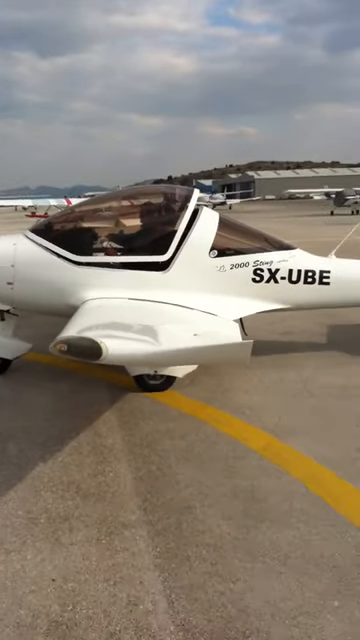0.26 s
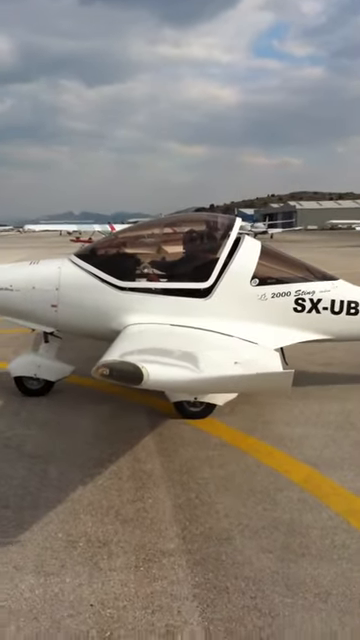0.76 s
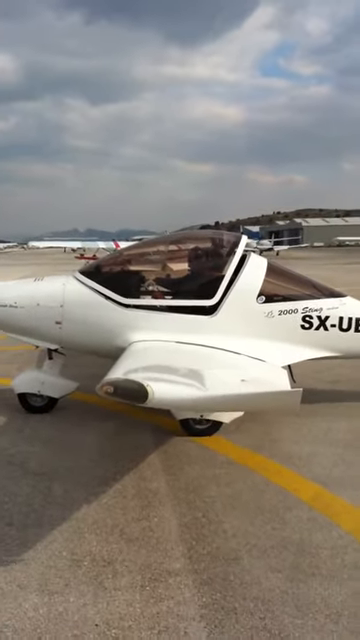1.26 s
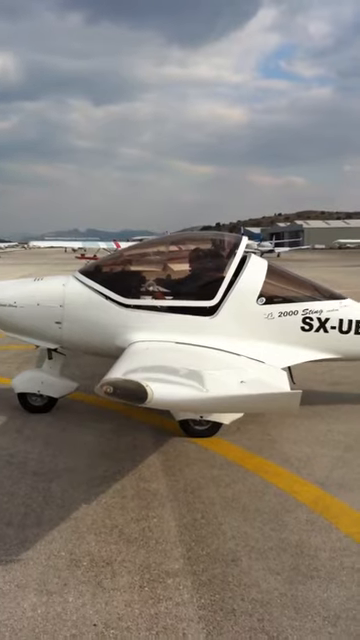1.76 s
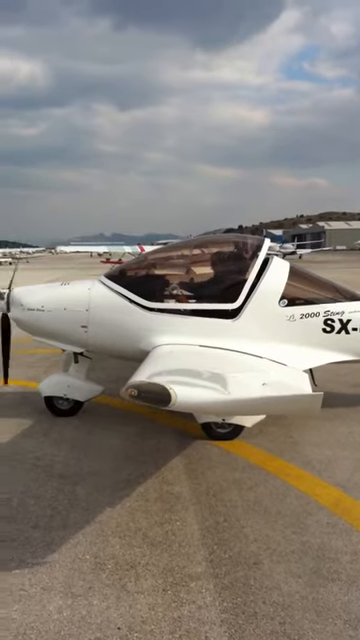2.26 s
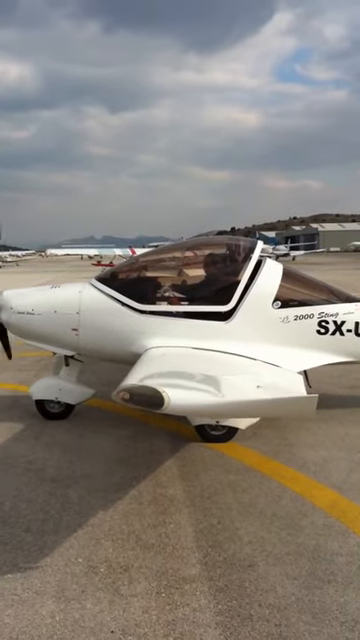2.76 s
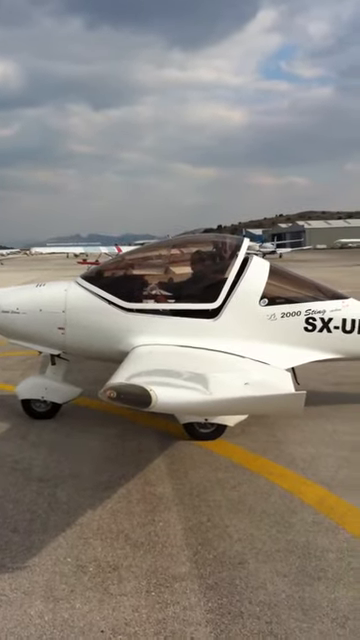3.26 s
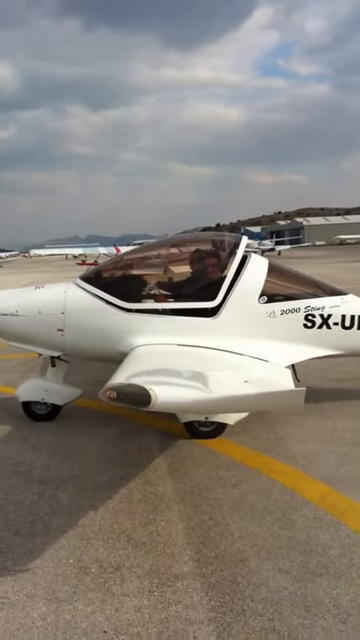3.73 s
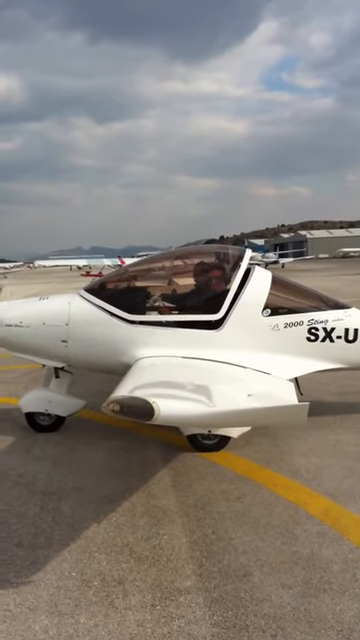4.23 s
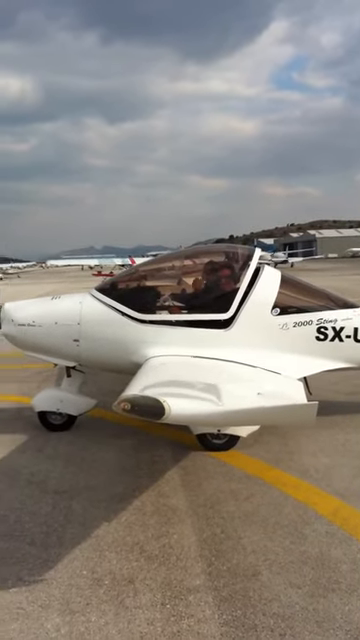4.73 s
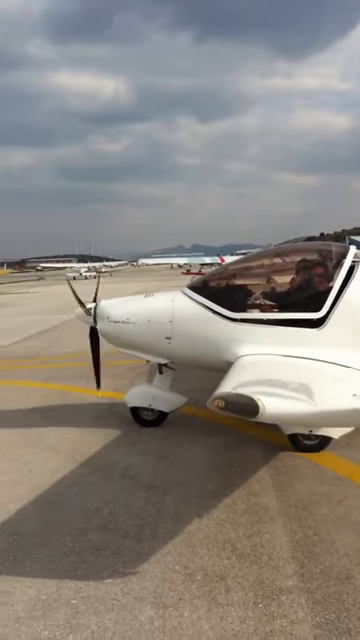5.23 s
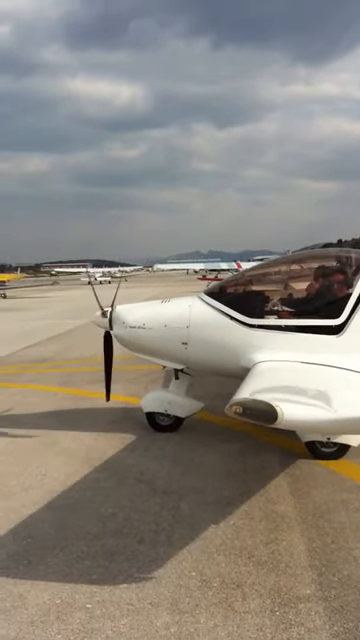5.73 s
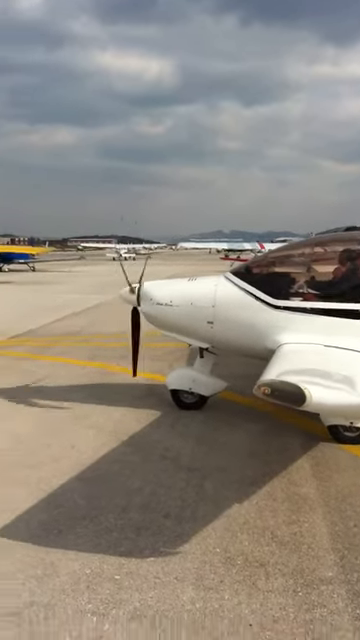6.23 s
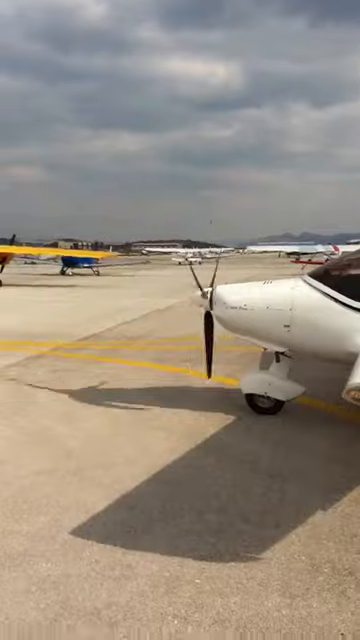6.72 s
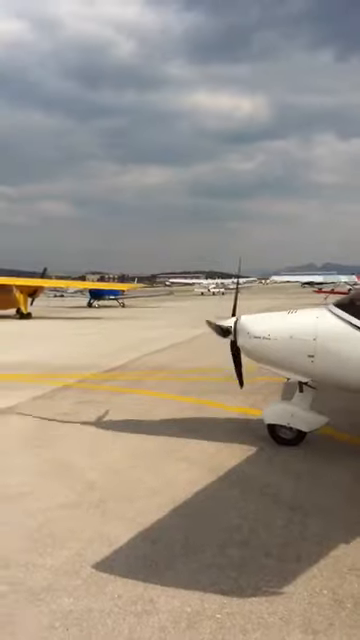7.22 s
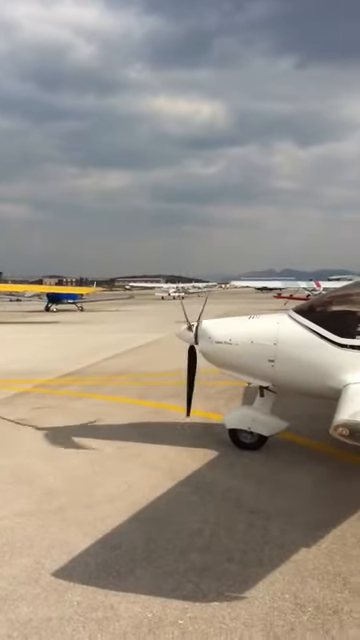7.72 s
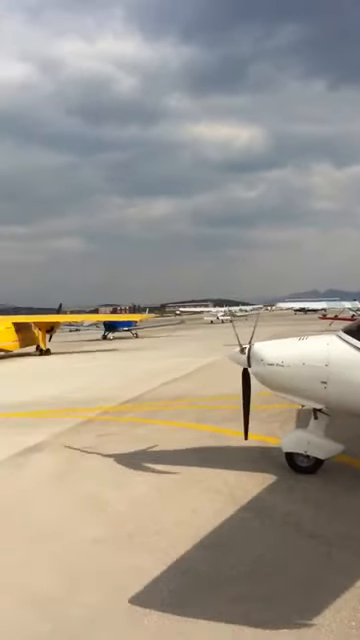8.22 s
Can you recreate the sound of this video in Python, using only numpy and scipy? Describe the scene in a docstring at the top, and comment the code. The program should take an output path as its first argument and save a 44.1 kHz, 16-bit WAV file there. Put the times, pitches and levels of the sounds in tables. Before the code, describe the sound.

Small aircraft engine ticks over and picks up to a faster idle, propeller blades swishing with a high fluttering whistle amid rough wind bursts.

```python
"""Light aircraft at idle

A light aircraft idles on an open apron and is eased up to a faster idle.
Each of its three propeller blades whistles over a broad hiss; its circling makes the pitch swoop and beams the sound.
Underneath, the geared four-cylinder engine burbles with filtered firing puffs and clatters with ringing noise.
Shaped noise makes the breeze and the gusts that buffet the microphone, with sharp pressure swings for cracks."""
import sys
import numpy as np
from scipy import signal
from scipy.fft import rfft, irfft, next_fast_len
from scipy.io import wavfile
from scipy.ndimage import map_coordinates

SR = 44100
rng = np.random.default_rng(int(sys.argv[2]) if len(sys.argv) > 2 else 0)


def pcm_store(signal):
    """Save signal as 16-bit PCM."""
    levels = np.round(np.clip(np.atleast_2d(signal), -1, 1) * 32767)
    wavfile.write(sys.argv[1], SR, levels.astype(np.int16).T)


N = 373968

# Swells of the breeze. Each row: start in seconds, length in seconds, level in dB before the bass cut.
SWELLS = [(0.372, 0.035, -29.5), (0.874, 0.092, -25), (1.094, 0.93, -24), (2.213, 0.18, -22.5),
          (3.206, 0.73, -31), (4.518, 0.338, -28), (5.042, 0.696, -22), (5.985, 0.74, -23),
          (7.577, 0.456, -23.5)]
# Gusts striking the microphone.
# Each row: start in seconds, length in seconds, relative level in dB, nominal brightness in Hz.
GUSTS = [(0.889, .025, -15.5, 280), (1.118, 0.027, -16.5, 433), (1.235, 0.014, -19.5, 157),
         (1.626, 0.047, -13, 880), (1.8, 0.046, -13, 1020), (1.878, .048, -14.5, 1340),
         (1.929, .042, -18, 910), (2.155, 0.03, -19, 340), (2.245, 0.047, -15, 400),
         (2.304, 0.0092, -12, 393), (2.383, 0.036, -14, 483), (2.827, 0.08, -23.5, 155),
         (3.453, 0.019, -25.5, 170), (3.908, 0.036, -20.5, 147), (4.52, 0.02, -26.5, 380),
         (4.991, 0.025, -16.5, 318), (5.175, 0.043, -14.5, 670), (5.217, 0.041, -19.5, 1000),
         (5.283, .02, -21, 650), (5.469, 0.034, -17.5, 550), (5.561, 0.074, -16, 640),
         (5.636, 0.11, -15, 670), (6.07, 0.057, -13.5, 450), (6.202, 0.031, -21, 460),
         (6.293, 0.13, -17.5, 477), (6.459, 0.05, -16.5, 320), (6.53, 0.045, -16.5, 470),
         (6.63, 0.084, -19, 280), (6.713, 0.0897, -15, 420), (7.687, 0.05, -19, 310),
         (7.762, 0.08, -17.5, 376), (7.86, 0.093, -19, 675), (7.952, 0.054, -12.5, 847),
         (8.01, 0.038, -25.5, 690)]
# The hardest eddies, which crack on the microphone.
# Each row: time in seconds, peak in dB before the bass cut, brightness in Hz.
CRACKS = [(.905, -9.5, 860), (1.139, -7.5, 1300), (1.634, -3, 1100), (1.823, -2, 1700), (1.89, -7.5, 1500),
          (1.962, -5, 950), (2.263, -7.5, 700), (5.205, -4, 1200), (5.572, -13, 800), (5.651, -6, 1000),
          (6.54, -9, 750), (6.746, -9, 700)]
# Engine levels over time. Each row: time in seconds, exhaust level in dB, clatter level in dB.
ENGINE_LEVELS = [(0, -40.5, -36.5), (1.5, -30.5, -38), (2.6, -36.5, -36.5), (4.4, -33, -34.5),
                 (5.9, -33.5, -36), (7.2, -33, -36), (8.48, -34.5, -38)]
# Strength of the four cylinders in firing order. Each entry: relative level in dB.
CYLINDERS = [2.5, -7.5, 7.5, -20]
# Clean engine tones. Each row: multiple of crank speed, relative level in dB.
ENGINE_TONES = [(4, -5), (6, 5.5), (9, -2.5), (10, -2), (11, -8.5), (12, -1.5), (13, -6.5), (16, -15)]
# Colour of the exhaust pipe. Each row: frequency in Hz, gain in dB.
PIPE_COLOUR = [(25, -42), (50, -28), (80, -14.5), (120, -3.5), (175, 5), (270, -9.5), (310, -4), (360, 0.5),
               (410, -22), (470, -31), (700, -17), (2000, -65)]
# Valve and gear knocks in one camshaft turn. Each row: place in the turn from 0 to 1, relative level in dB.
KNOCKS = [(0, -1.5), (.2, -13.5), (0.389, -3.5), (0.611, -9), (0.802, -22)]
# Colour of the engine casing. Each row: frequency in Hz, gain in dB.
CASING_COLOUR = [(100, -30), (400, -9), (560, -8), (900, -18), (1300, 3), (1650, -2), (2700, -3.5),
                 (3400, -6.5), (4700, -12.5), (7000, -10.5), (11000, -11.5), (15500, -18.5)]
# Ringing of the crankcase and cowling. Each row: frequency in Hz, width in Hz, gain in dB.
COWL_MODES = [(518, 62, 0.5), (705, 49, 10.5), (765.7, 21.7, 14.5), (1020, 77, 4), (1180, 39, 7.5),
              (1290, 48, 1.5), (2007, 210, -1), (2493, 43, 3)]
# Ringing of the gearbox. Each row: frequency in Hz, width in Hz, gain in dB.
GEARBOX_MODES = [(3290, 170, -7), (4100, 70, 10), (5350, 67, 7.5)]
# Gearbox buzz, heard once the nose faces the listener. Each row: time in seconds, level in dB.
GEARBOX_LEVEL = [(0, -68), (4, -56.5), (7, -51.5), (8.48, -52)]
# Propeller speed over time. Each row: time in seconds, speed in turns per second.
PROPELLER_SPEED = [(0, 9.374), (.6, 8.784), (1.25, 9.525), (1.7, 10.677), (2.6, 11.117), (3.2, 11.182),
                   (3.65, 11.454), (4, 11.231), (4.4, 12.427), (5.35, 13.556), (5.85, 13.332), (7, 13.519),
                   (7.5, 13.397), (8.48, 13.462)]
# Blade whistles at cruising idle, before the Doppler bend.
# Each row: place in the turn from 0 to 1, pitch in Hz, relative level in dB, exponent of pitch against speed.
BLADES = [(.98, 8180, -1.3, .9), (.305, 6980, -.6, .7), (.64, 7760, -.7, .92)]
# Broad hiss of a blade in its own frame at cruising idle. Each row: frequency in Hz, gain in dB.
HISS_COLOUR = [(2500, -7), (4500, -26), (6000, 4.5), (7500, -11), (9000, 2.5), (11000, -14.5), (15000, -38),
               (20000, -42)]
# Propeller level over time, whistle and hiss together. Each row: time in seconds, level in dB.
PROPELLER_LEVEL = [(0.0, -37.5), (0.12, -36), (0.99, -39), (3.71, -32.5), (4.04, -34.5), (4.7, -27.5),
                   (5.2, -29.5), (5.22, -35), (5.5, -31.5), (6.68, -29), (6.75, -32), (7.89, -28),
                   (8.12, -33.5), (8.48, -30.5)]
# The listener's walk from the wing to the nose. The entries: start in seconds, end in seconds.
WALK_S = (1.1, 4.4)

CALM_DB = -41  # the air between swells, before the bass cut
SWELL_RISE_S, SWELL_FALL_S = 0.052, 0.015
GUST_RISE_S, GUST_FALL_S = 0.008, 0.013  # upper limits: short gusts turn faster
# hard eddies inside a gust: rate, peak over the gust's level, factor on its nominal brightness
POPS_PER_S, POP_DB, POP_BRIGHTER = 16, 4.5, 1.33
IDLE_TURNS = 13.4  # cruising idle, propeller turns per second
GEAR = 2.43  # crank turns per propeller turn
# as the listener walks, the blades' beam meets them ever earlier in the turn
WING_AIM_RAD, NOSE_AIM_RAD = 0.47, -0.29
TOP_HZ = 15750  # the microphone's band limit


def amp(db):
    """Decibels to gain."""
    return 10 ** (np.asarray(db) / 20)


def unit(x):
    """Scale to rms 1."""
    return x / np.sqrt(np.mean(x ** 2) + 1e-20)


def shape(points, hz):
    """Gain of (Hz, dB) points, read on a log-frequency axis."""
    point_hz, db = np.transpose(points)
    return amp(np.interp(np.log(hz + 1), np.log(point_hz), db))


def ringing(modes, hz):
    """Gain of resonances given as (Hz, width Hz, dB), their powers added."""
    power = 0
    for mode_hz, width_hz, db in modes:
        resonance = hz * width_hz / (mode_hz ** 2 - hz ** 2 + 1j * hz * width_hz)
        power = power + np.abs(amp(db) * resonance) ** 2
    return np.sqrt(power)


def curves(rows):
    """One value per sample for each column after the time."""
    seconds, *columns = np.transpose(rows)
    return [np.interp(np.arange(N) / SR, seconds, column) for column in columns]


def wobble(rate):
    """A smooth random curve with rate knots a second."""
    coarse = np.arange(0, N + 32, 32)
    knots = rng.standard_normal(int(N * rate / SR) + 4)
    smooth = map_coordinates(knots, [coarse * rate / SR])
    return np.interp(np.arange(N), coarse, smooth)


def filtered(x, response):
    """Filter x by a response given as a function of frequency."""
    size = next_fast_len(len(x) + 8192)
    spectrum = rfft(x, size) * response(np.fft.rfftfreq(size, 1 / SR))
    return irfft(spectrum, size)[:len(x)]


def noise(response, size=N):
    """Coloured noise of rms 1."""
    return unit(filtered(rng.standard_normal(size), response))


def narrow(phase, width_hz):
    """A fuzzy line of rms 1 that follows a running phase."""
    def line(hz):
        return 1 / (1 + (hz / width_hz) ** 2)
    return noise(line) * np.cos(phase) + noise(line) * np.sin(phase)


def eddies(hz, bright_hz, port_hz=2900, boom_hz=265, boom_db=3.0):
    """Spectrum of turbulence at the port: faster air makes smaller eddies, over a hollow boom."""
    octaves = np.log2((hz + 1) / boom_hz)
    boom = amp(boom_db * np.exp(-(octaves / 0.54) ** 2))
    turbulence = np.exp(-hz / bright_hz) * hz / (hz + 140)
    return boom * turbulence / np.sqrt(1 + (hz / port_hz) ** 7)


def swings(kicks, bright_hz):
    """Each kick becomes one swing of pressure; the largest peaks at 1."""
    swing = filtered(kicks, lambda hz: -1j * eddies(hz, bright_hz))
    return swing / swing.max()


def breeze(soft_hz=135, strong_hz=260, strong_db=-24, lumps_db=3.0):
    """Lumpy low buffeting swells out of calm air, holds and drops back; stronger air is brighter."""
    t = np.arange(N) / SR
    level = np.full(N, amp(CALM_DB))
    for start_s, length_s, db in SWELLS:
        before = np.maximum(start_s - t, 0) / SWELL_RISE_S
        after = np.maximum(t - start_s - length_s, 0) / SWELL_FALL_S
        level = np.maximum(level, amp(db) * np.exp(-(before + after)))
    # power share of the brighter air, one half at strong_db
    share = level ** 2 / (level ** 2 + amp(strong_db) ** 2)
    soft = np.sqrt(1 - share) * noise(lambda hz: eddies(hz, soft_hz))
    strong = np.sqrt(share) * noise(lambda hz: eddies(hz, strong_hz))
    return level * unit((soft + strong) * amp(lumps_db * wobble(45)))


def pops(gate, bright_hz):
    """Hard eddies hit at chance moments, favouring those when the gate is open."""
    count = int(np.ceil(POPS_PER_S * gate.sum() / SR))
    moments = np.argsort(-gate * rng.random(len(gate)))[:count]
    kicks = np.bincount(moments, minlength=len(gate))
    return amp(POP_DB) * swings(kicks, bright_hz)


def gusts(gust_db=1, tear_db=4.5, fine_db=-3):
    """Sudden bright gusts tear across the port, and hard eddies pop inside them."""
    air = np.zeros(N)
    t = np.arange(SR // 3) / SR
    lead = 0.05  # seconds of room for the onset
    tearing = wobble(260)
    for start_s, length_s, db, bright_hz in GUSTS:
        start = round((start_s - lead) * SR)
        span = slice(start, start + len(t))
        rise, fall = np.minimum([GUST_RISE_S, GUST_FALL_S], length_s / 4)
        gate = (np.tanh((t - lead) / rise) - np.tanh((t - lead - length_s) / fall)) / 2
        # large eddies push evenly, small ones strike in uneven spikes
        steady = gate * rng.standard_normal(len(t))
        push = unit(filtered(steady, lambda hz: eddies(hz, 0.86 * bright_hz)))
        spikes = gate * amp(tear_db * tearing[span]) * rng.standard_normal(len(t))
        fine = unit(filtered(spikes, lambda hz: eddies(hz, 1.074 * bright_hz)))
        gust = unit(push + amp(fine_db) * fine) * np.sqrt(length_s / t[-1])  # about rms 1 while it blows
        air[span] += amp(db + gust_db) * (gust + pops(gate, POP_BRIGHTER * bright_hz))
    return air


def cracks():
    """Each of the hardest eddies is one sharp swing of pressure."""
    air = np.zeros(N)
    half = 2048  # samples either side of the kick
    kick = signal.unit_impulse(2 * half, "mid")
    for time_s, db, bright_hz in CRACKS:
        start = round(time_s * SR) - half
        air[start:][:len(kick)] += amp(db) * swings(kick, bright_hz)
    return air


def wind(low_hz=138, leak_db=-39):
    """Breeze, gusts and cracks strike a microphone that sheds the bass, bar a faint leak."""
    air = breeze() + gusts() + cracks()
    bass_cut = signal.butter(4, low_hz, "highpass", fs=SR, output="sos")
    return signal.sosfilt(bass_cut, air) + amp(leak_db) * air


def rattle(crank, knock_db=6, decay_turns=0.12, scatter_db=1.55):
    """Valves and gears knock in step with the camshaft, at half crank speed, over steady noise."""
    cam = crank / 2
    knocks = np.zeros(N)
    for place, db in KNOCKS:
        since_knock = (cam - place) % 1
        knocks += amp(db + knock_db) * np.exp(-since_knock / decay_turns)
    return rng.standard_normal(N) * np.sqrt(1 + knocks ** 2) * amp(scatter_db * wobble(60))


def clatter(crank, level_db):
    """The rattle rings the cowling all round, and the gearbox towards the front."""
    cowling = filtered(rattle(crank), lambda hz: np.hypot(shape(CASING_COLOUR, hz), ringing(COWL_MODES, hz)))
    gearbox = filtered(rattle(crank), lambda hz: ringing(GEARBOX_MODES, hz))
    gearbox_db, = curves(GEARBOX_LEVEL)
    return amp(level_db) * unit(cowling) + amp(gearbox_db) * unit(gearbox)


def exhaust(crank, scatter_db=2, gas_gain=2.0, tones_db=-5):
    """Two firings per crank turn puff through the muffler, each followed by turbulent gas."""
    firing = 2 * crank
    at = np.flatnonzero(np.diff(np.floor(firing)))
    puffs = np.zeros(N)
    puffs[at] = amp(np.resize(CYLINDERS, len(at)) + scatter_db * rng.standard_normal(len(at)))
    gas = rng.standard_normal(N) * np.exp(-1.5 * (firing % 1))
    flow = unit(puffs) + gas_gain * unit(gas)
    burble = unit(filtered(flow, lambda hz: shape(PIPE_COLOUR, hz)))
    hum = np.zeros(N)
    for multiple, db in ENGINE_TONES:
        phase = 2 * np.pi * multiple * crank + 0.86 * wobble(9)
        hum += amp(db + 1.6 * wobble(5)) * np.sin(phase)
    return unit(burble + amp(tones_db) * unit(hum))


def propeller(speed, turns, skirt_hz=520, hiss_db=-11, hiss_beam_db=7, waver=0.008, flutter_db=0.95):
    """Each blade sheds vortices at a narrow pitch; its circling bends the pitch and beams the sound forward."""
    mach, swoop, beam_db = 0.18, 0.03, 14  # blade speed over sound speed, extra pitch bend, whistle beaming
    width_hz, skirt_db, crest_db = 220, -3, 5
    pace = speed / IDLE_TURNS
    aim = np.interp(np.arange(N) / SR, WALK_S, [WING_AIM_RAD, NOSE_AIM_RAD])
    sound = np.zeros(N)
    for place, pitch_hz, db, exponent in BLADES:
        heard = 2 * np.pi * (turns - place)
        # the approach is heard compressed in time, the retreat stretched
        angle = heard + mach * np.sin(heard + mach * np.sin(heard))
        # the brief moment when the blade comes straight at the listener
        crest = np.exp(6 * (np.cos(angle) - 1))
        doppler = 1 / (1 - mach * np.cos(angle)) + swoop * crest * (1 + 0.6 * wobble(30))
        # the blade's own time, in samples, runs faster with speed and approach
        clock = np.cumsum(doppler * pace ** exponent * (1 + waver * wobble(40)))
        phase = 2 * np.pi * pitch_hz * clock / SR
        # the rest of the blade's span smears the line into a skirt
        skirt = amp(skirt_db + crest_db * crest) * narrow(0.99 * phase, skirt_hz)
        whistle = narrow(phase, width_hz) + skirt
        hiss = map_coordinates(noise(lambda hz: shape(HISS_COLOUR, hz)), [clock], mode="wrap")
        away = 1 - np.cos(angle - aim)  # 0 when the beam points at the listener
        beamed_whistle = amp(-beam_db * away) * whistle
        beamed_hiss = amp(hiss_db - hiss_beam_db * away) * hiss
        sound += amp(db + flutter_db * wobble(25)) * (beamed_whistle + beamed_hiss)
    level_db, = curves(PROPELLER_LEVEL)
    return amp(level_db) * unit(sound)


def scene():
    """One shaft speed drives the propeller and, through the gearbox, the engine."""
    speed, = curves(PROPELLER_SPEED)
    turns = np.cumsum(speed) / SR
    crank = GEAR * turns
    exhaust_db, clatter_db = curves(ENGINE_LEVELS)
    engine = amp(exhaust_db) * exhaust(crank) + clatter(crank, clatter_db)
    return (wind() + engine + propeller(speed, turns))[None]


def record(dry):
    """The microphone rounds off the strongest gusts and keeps nothing above its band limit."""
    ceiling = 0.73
    rounded = dry[0] / (1 + np.abs(dry[0] / ceiling) ** 8) ** (1 / 8)
    return filtered(rounded, lambda hz: hz < TOP_HZ)[None]


dry = scene()
out = record(dry)
pcm_store(out)
```